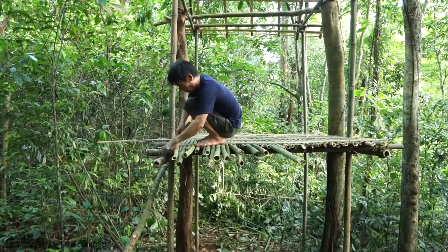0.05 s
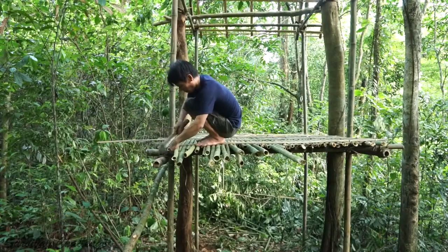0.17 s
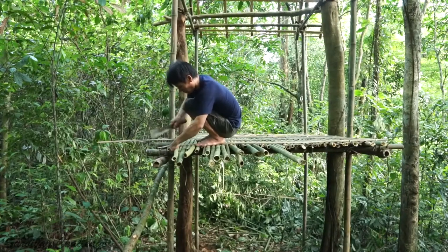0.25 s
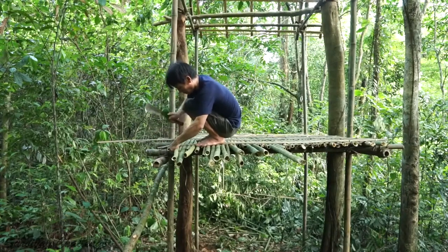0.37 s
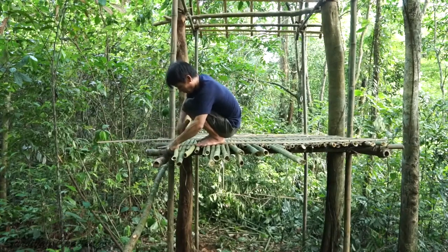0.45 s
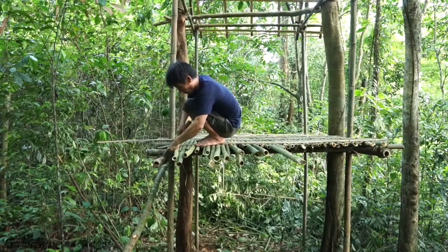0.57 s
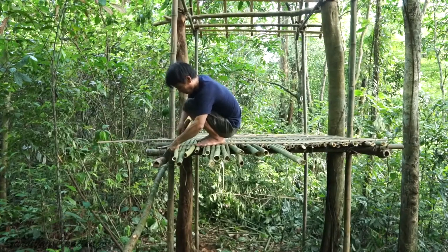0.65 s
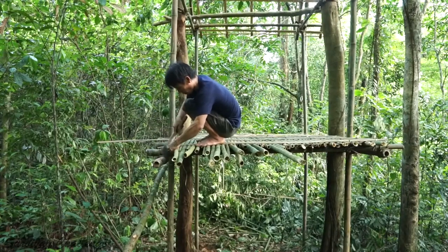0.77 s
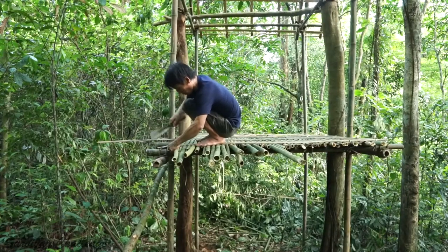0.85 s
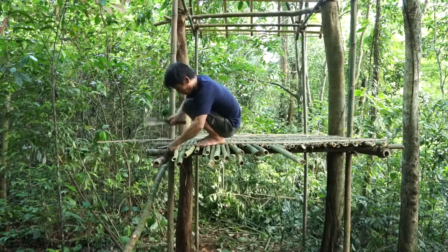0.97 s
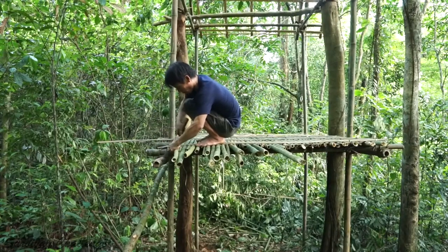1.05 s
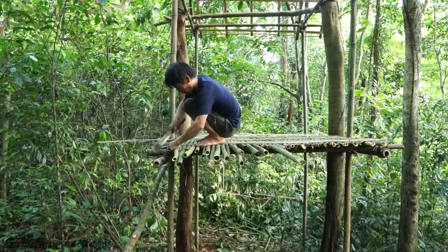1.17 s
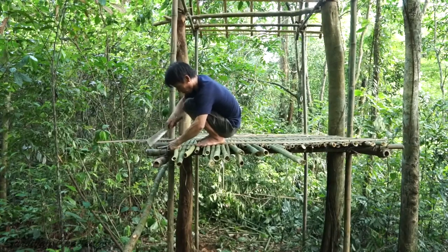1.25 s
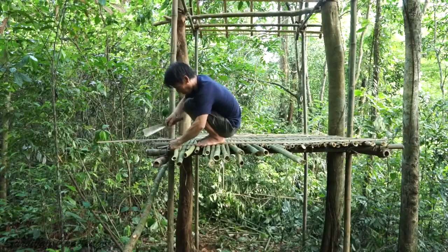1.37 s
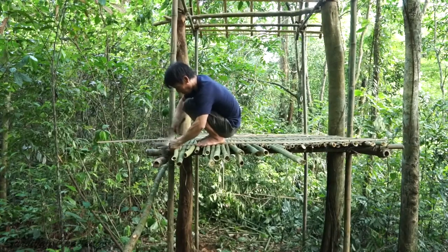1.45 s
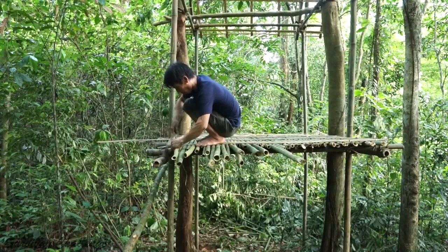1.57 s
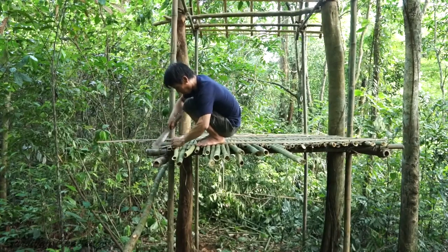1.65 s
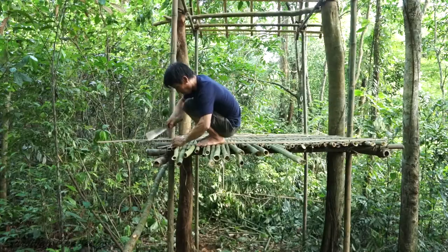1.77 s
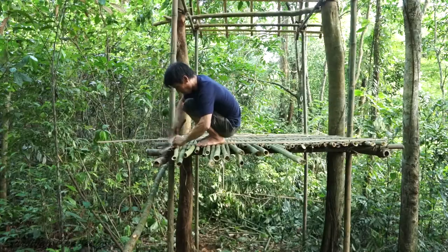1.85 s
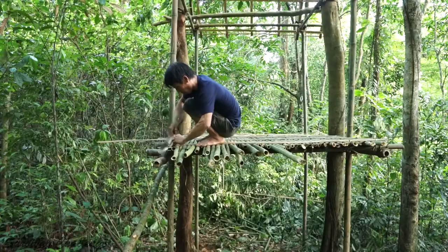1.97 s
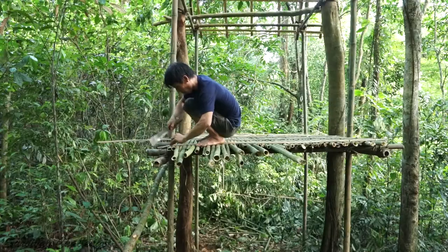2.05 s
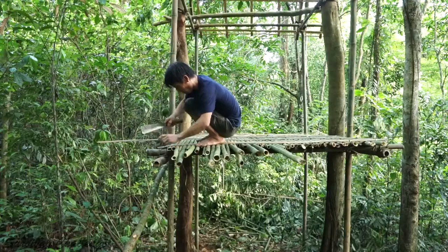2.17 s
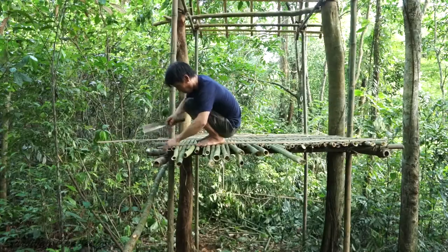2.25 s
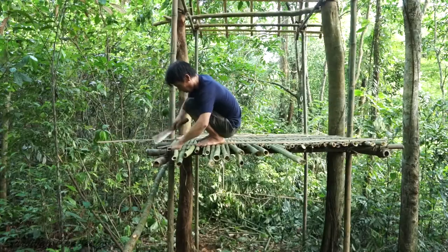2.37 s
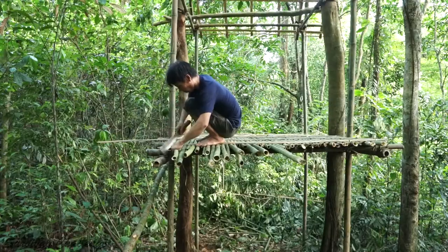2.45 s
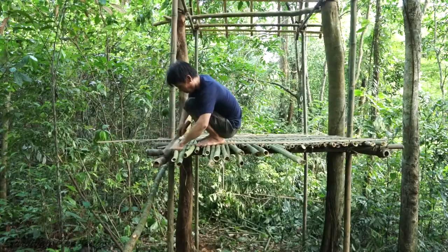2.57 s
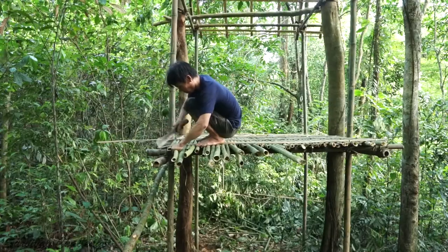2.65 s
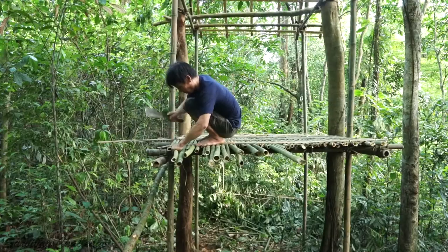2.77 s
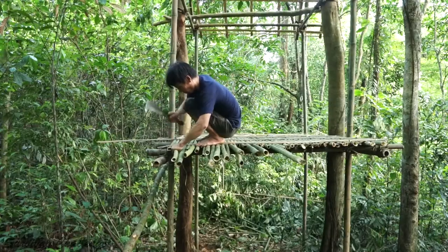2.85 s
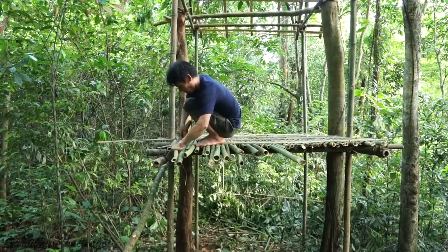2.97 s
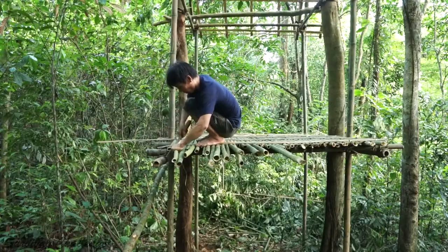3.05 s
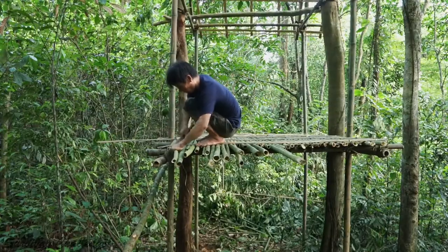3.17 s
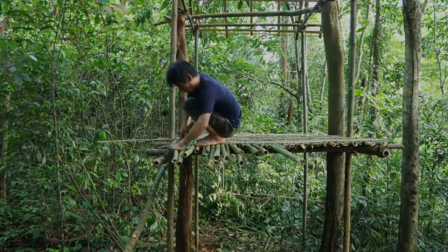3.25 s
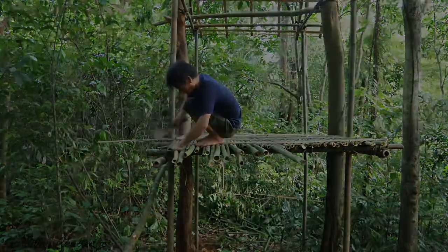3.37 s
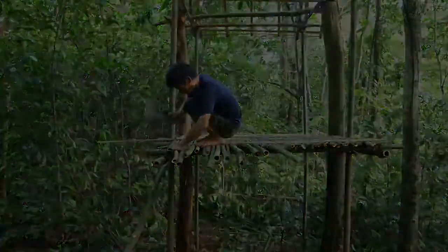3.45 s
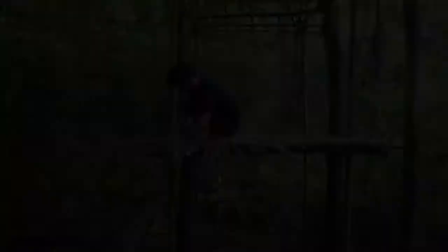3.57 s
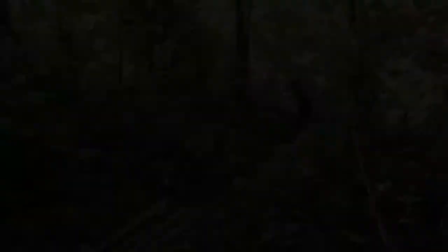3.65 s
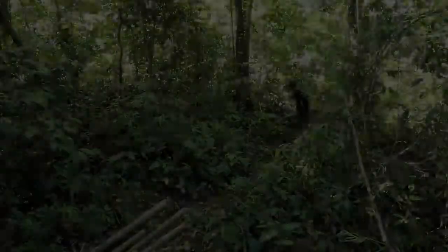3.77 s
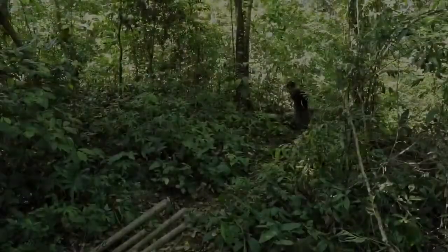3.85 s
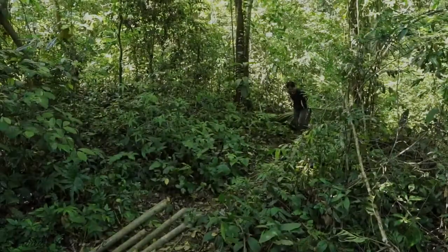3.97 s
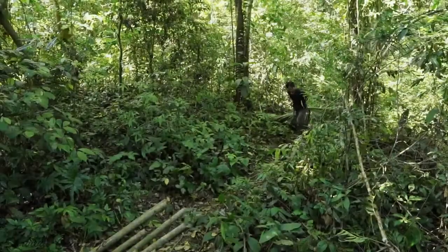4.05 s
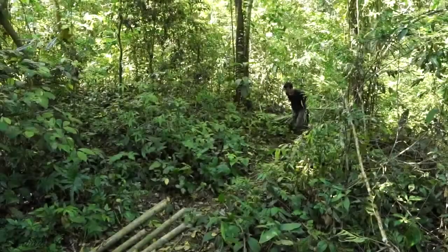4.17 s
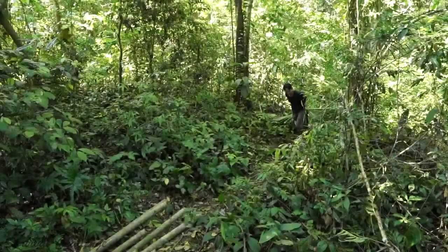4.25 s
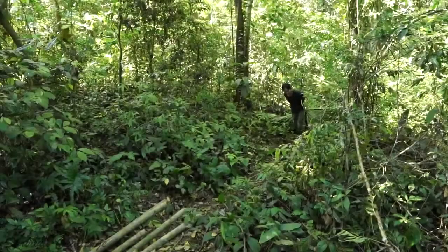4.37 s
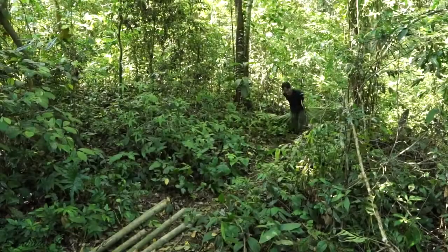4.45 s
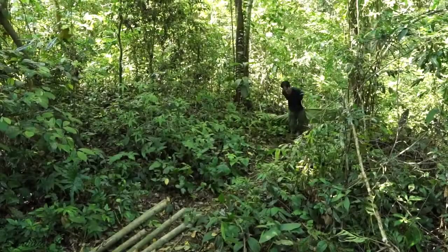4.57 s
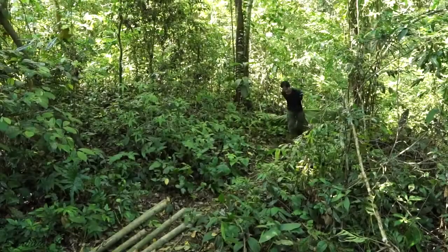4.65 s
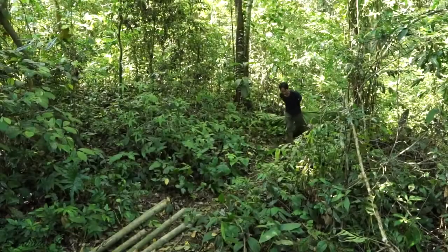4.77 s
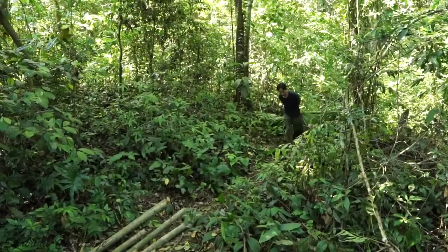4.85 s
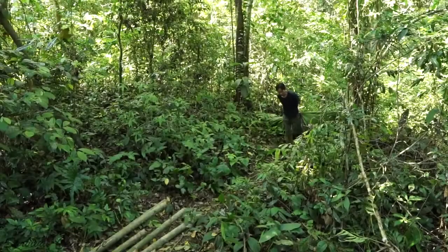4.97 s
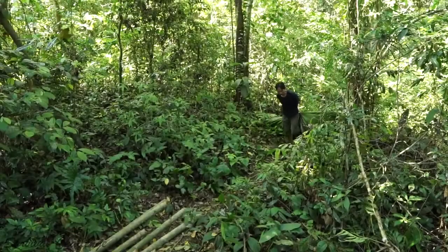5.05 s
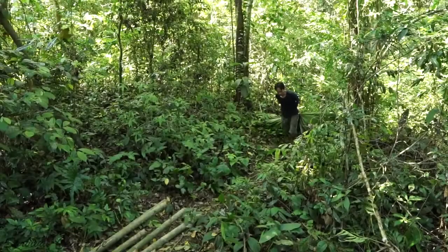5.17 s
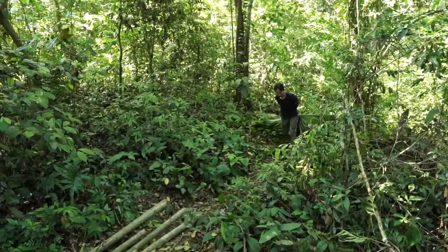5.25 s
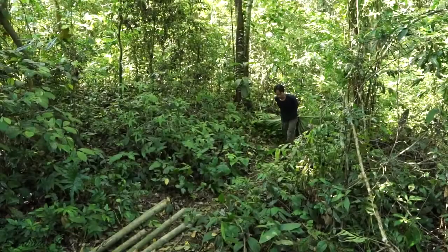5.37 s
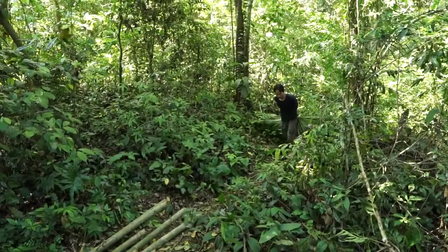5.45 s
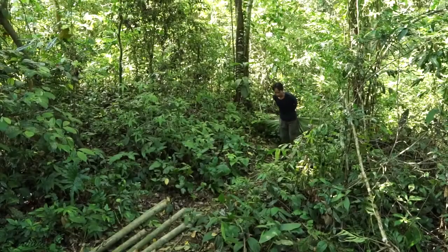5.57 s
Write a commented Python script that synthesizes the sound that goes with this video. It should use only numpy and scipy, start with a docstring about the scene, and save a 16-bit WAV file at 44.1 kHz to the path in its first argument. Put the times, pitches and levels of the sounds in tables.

```python
"""A platform in a jungle, where bamboo poles are knocked into place. Each blow excites the hollow modes of
poles and floor; small clacks, soft bumps and shaken leaves join in, and insects sing behind. After a short
silence comes a second spot, where strides swell a steady forest hiss and dry twigs snap. Trees scatter
the impacts back. Mains hum and a thin electric whine lie under both spots; the sound is mono."""
import sys
import numpy as np
from scipy import signal
from scipy.fft import rfft, irfft
from scipy.io import wavfile
from scipy.ndimage import uniform_filter1d, minimum_filter1d

SR = 44100
rng = np.random.default_rng(int(sys.argv[2]) if len(sys.argv) > 2 else 0)


def output_pcm(signal):
    """Save a mono or channel-first signal as 16-bit PCM at the path in sys.argv[1].

    Samples are clipped to [-1, 1] before scaling.
    """
    pcm = np.clip(np.atleast_2d(signal).T, -1, 1) * 32767
    wavfile.write(sys.argv[1], SR, np.round(pcm).astype(np.int16))


N = 247401
T = np.arange(N) / SR

# spectra of dry wood contacts and of brushing leaves: (frequency [Hz], relative level [dB])
WOOD_SPECTRUM = [(60, -53), (200, -33), (450, -9), (700, -2.5), (1200, -0.5), (3000, 1), (5500, -2),
                 (9500, -3), (12000, -10.5), (16000, -30)]
LEAF_SPECTRUM = [(100, -6.5), (170, -1), (330, -1), (520, 1), (800, -1), (1000, -3.5), (1300, -1.5),
                 (1900, -5.5), (2800, -2), (3700, -5), (5400, -6), (9500, -8.5), (12000, -18.5),
                 (15500, -25)]


def knock(t, body_db, low_db, rise, t60, hollow_hz, upper_hz):
    """Impact excitation: the contact cracks, then the modes decay freely as neighbouring poles rattle."""
    # modes of the bamboo floor: (frequency [Hz], relative level [dB], t60 over the blow's [ratio])
    modes = [(232, -15.5, 1.9), (333, -9.5, 3.2), (382, -13.5, 1.5), (486.4, -0.5, 1.76), (561, 2.5, 2.3),
             (660, -15.5, 0.51), (810, -9.5, 3.6), (879, 0.5, 1.65), (973, -15.5, 1.75), (1037, -3.5, 0.86),
             (1170, -2.5, 0.85), (1355, 2, 0.85), (1570, -3, 1.6), (1750, 4, 0.48), (1610, -27, .9),
             (2030, -3, 0.52), (2200, -10, 0.86), (2506, 0.5, 0.45), (2575, -25, 0.52), (3050, -1, 0.89),
             (3720, -36, 0.91), (4620, -1, .6)]
    # spectra of the rattle and the crack: (frequency [Hz], relative level [dB])
    rattle_spectrum = [(60, -47), (150, -10.5), (230, -10), (450, 0), (750, 1.5), (1050, 1), (1500, -4),
                       (2600, -7.5), (5000, -18), (9000, -15), (12000, -25), (16000, -38)]
    crack_spectrum = [(80, -53), (300, -25), (1000, -38), (2500, -0.5), (4500, -3.5), (7500, -2),
                      (10000, -7), (12000, -14.5), (16000, -50)]

    def emphasis(f):  # where the blow lands decides which modes stand out
        return 9 * hump(f, hollow_hz, 0.16) + 6 * hump(f, upper_hz, 0.14) + low_db * hump(f, 445, 1.0)
    hz, db, t60_ratio = np.transpose(modes)
    scatter_db, detune, start_cycles = rng.standard_normal((len(hz), 3)).T
    gain = undb(db + emphasis(hz) + scatter_db)
    phase = 2 * np.pi * (np.outer(hz * (1 + .01 * detune), t) + start_cycles[:, None])
    partials = np.sin(phase) * fade(t, rise, t60 * t60_ratio[:, None])
    ring = gain @ partials / np.sqrt(np.sum(gain ** 2) / 2)
    rattle = burst(lambda f: slope(rattle_spectrum)(f) + emphasis(f), fade(t, rise, 1.27 * t60))
    crack = burst(slope(crack_spectrum), fade(t, rise=0.00012, t60=0.035))
    crack_db = -4.5 + 2.4 * (body_db + 8)  # harder blows crack disproportionately more
    return undb(body_db) * (undb(-3.5) * ring + undb(0.08) * rattle) + undb(crack_db) * crack


def clack(t, db, tilt_db, ring_hz, t60):
    """Resonance: a light contact between poles excites a common hollow note and one ring of its own."""
    def shape(f):
        return wood(f, tilt_db) + 9 * hump(f, ring_hz, 0.11) + 8 * hump(f, 1010, 0.054)
    rise = 0.014 * t60  # a longer slide also builds up longer
    return undb(db) * burst(shape, grain(t, spread_db=1.1) * fade(t, rise, t60))


def twig(t, db, tilt_db, ring_hz, t60, splinter_db):
    """Brittle fracture: a dry snap, then the last fibres give way, weaker and brighter."""
    def crack(tilt):
        envelope = grain(t, spread_db=1) * fade(t, 0.00023, t60)
        return burst(lambda f: wood(f, tilt) + 6 * hump(f, ring_hz, 0.21), envelope)
    delay_s = .023
    splinter = np.pad(crack(tilt_db + 2), (int(delay_s * SR), 0))[:len(t)]
    return undb(db) * (crack(tilt_db) + undb(splinter_db) * splinter)


def bump(t, db, hz, t60):
    """Soft contact: the slow push of a hand or foot excites only a low, narrow band."""
    def shape(f):
        return -20 * np.log10(1 + 1.3 * (f / hz - hz / (f + 30)) ** 2)
    return undb(db) * burst(shape, fade(t, 0.036 * t60, t60))


def shake(t, db, t60):
    """Friction: leaves shaken by the poles brush each other in a short crackle."""
    return undb(db) * burst(slope(LEAF_SPECTRUM), grain(t, spread_db=4.5) * fade(t, .02, t60))


def trees(x):
    """Scattering: near trunks and leaves return a short tail, far ones a faint long tail."""
    # spectrum of the scattered sound: (frequency [Hz], relative level [dB])
    echo_spectrum = [(100, 6), (400, 0.5), (1000, -10), (2500, -2), (5000, 2), (9000, -1.5), (13000, -6),
                     (16000, 0)]
    t = T[:SR]
    near = fade(t, rise=0.023, t60=0.17)
    far = undb(-9.5) * fade(t, rise=0.023, t60=0.84)
    tail = burst(slope(echo_spectrum), near + far)
    return signal.fftconvolve(x, tail / np.sqrt(np.sum(tail ** 2)))[:N]


def undergrowth():
    """Incoherent addition: a steady leaf hiss and the swell of each stride sum in power."""
    # strides through the leaves: (time [s], level [dB])
    strides = [(3.84, -36.5), (3.99, -39), (4.55, -38.5), (5.02, -37.5), (5.46, -35.5)]
    # the low swish comes and goes more than the fine hiss
    swish = noise(lambda f: 35 * hump(f, 900, 1.1)) * undb(-13 + 2.7 * drift(7))
    hiss = noise(slope(LEAF_SPECTRUM)) * undb(1.3 * drift(25.38) + 0.85 * drift(400))
    swells = [undb(db) * fade(np.maximum(T - s, 0), rise=0.093, t60=4.5) for s, db in strides]
    steady = undb(-40)
    return (hiss + swish) * np.sqrt(steady ** 2 + np.sum(np.square(swells), axis=0))


def insects():
    """Narrow-band noise: distant choruses merge into shimmering bands; one high insect calls briefly."""
    # choruses: (centre [Hz], nominal width [Hz], level [dB])
    choruses = [(3734, 290, -44.5), (4830, 420, -53.5), (7160, 210, -56), (7580, 230, -58.5)]
    # strength of the single call: (time [s], level [dB])
    call_levels = [(.1, -71), (.25, -52), (.5, -62), (.62, -90), (1, -120)]

    def band(hz, half_width_hz):
        return noise(lambda f: -20 * np.log10(1 + ((f - hz) / half_width_hz) ** 2))
    chorus = sum(band(hz, 0.67 * width) * undb(db + drift(8.24) + 0.55 * drift(45))
                 for hz, width, db in choruses)
    return chorus + band(10780, 130) * undb(np.interp(T, *np.transpose(call_levels)))


def forest_air():
    """Ambient noise: a broad, slightly wavering band with a faint, far drone."""
    # spectrum of the ambience: (frequency [Hz], relative level [dB])
    air_spectrum = [(25, 15), (70, 3), (150, 4.5), (330, 0), (600, 4), (1300, 2), (2000, -1), (3000, -3.5),
                    (5800, -5), (8500, -14.5), (11500, -17), (16000, -18.5)]
    drone = noise(lambda f: 60 * hump(f, 235.0, 0.11)) * undb(-55.5)
    return noise(slope(air_spectrum)) * undb(-44.5 + .5 * drift(6.84)) + drone


def mains(first, second, mains_hz=50):
    """Electrical interference: harmonics hum, and a high whine is on for half of every mains cycle."""
    # hum harmonics from the fundamental up: (level [dB])
    hum_levels = [-38.5, -57, -56]
    # whine tones: (frequency [Hz], level at the first spot [dB], level at the second [dB])
    whine_tones = [(4890, -72, -49.5), (9640, -66, -55), (12940, -67, -52)]
    hum = sum(undb(db) * tone(mains_hz * k) for k, db in enumerate(hum_levels, 1))
    gate = uniform_filter1d(1. * (T * mains_hz % 1 > .5), size=30)
    whine = sum((undb(first_db) * first + undb(second_db) * second) * tone(hz)
                for hz, first_db, second_db in whine_tones)
    return hum * (first + second) + gate * whine


def ducking(second_start_s, sunk_db=-3.5, recover_db_per_s=2):
    """Gain ducking: the background drops to one level at the listed hits, then climbs steadily."""
    # the sharpest hits: (time [s])
    hit_times = [.557, 1.139, 3.027, 5.27]
    # gain before any hit: (first spot [dB], second spot [dB])
    resting_gains = [-0.8, 2.5]
    at_first = T < second_start_s
    db = np.where(at_first, *resting_gains)
    for s in hit_times:
        same_spot = at_first == (s < second_start_s)
        db = np.where((T > s) & same_spot, sunk_db + recover_db_per_s * (T - s), db)
    return undb(uniform_filter1d(db, size=400))


def burst(shape, envelope):
    """Source and filter: a flurry of contacts rings a body whose spectrum in dB is shape(Hz)."""
    size = len(envelope)
    flurry = rfft(rng.standard_normal(size) * envelope)
    f = np.maximum(np.fft.rfftfreq(size, 1 / SR), 1)
    # sharp contacts spread their energy evenly over frequency, so the flurry is flattened
    local_magnitude = np.sqrt(uniform_filter1d(np.abs(flurry) ** 2, size=50))
    cepstrum = irfft(np.log(undb(shape(f)) / local_magnitude))
    causal = np.r_[1, np.full(size // 2 - 1, 2), np.zeros(size // 2)]
    response = np.exp(rfft(cepstrum * causal))  # minimum phase: the ring follows the contact
    return unit(irfft(flurry * response)) * np.sqrt(np.mean(envelope ** 2))


def grain(t, spread_db):
    """Stick-slip: fibres catch and release, so the strength changes every millisecond."""
    steps = t[::SR // 1000]
    return undb(spread_db * np.interp(t, steps, rng.standard_normal(len(steps))))


def fade(t, rise, t60):
    """Damping: a linear rise, then an exponential decay of 60 dB in t60 seconds."""
    return np.minimum(t / max(rise, 1 / SR), 1) * np.exp(-np.log(1000) * np.maximum(t - rise, 0) / t60)


def wood(f, tilt_db):
    """Spectral tilt: the dry wood spectrum in dB, tipped by tilt_db per octave."""
    return slope(WOOD_SPECTRUM)(f) + tilt_db * np.log2(f / 3000)


def slope(points):
    """Interpolation over log frequency: a spectrum table as a function from Hz to dB."""
    hz, db = np.transpose(points)
    return lambda f: np.interp(np.log(f), np.log(hz), db)


def hump(f, hz, octaves):
    """Resonance peak: a bell of height 1 around hz."""
    return np.exp(-.5 * (np.log2(f / hz) / octaves) ** 2)


def noise(shape):
    """Spectral shaping: noise of rms 1 whose spectrum in dB is shape(Hz)."""
    f = np.maximum(np.fft.rfftfreq(N, 1 / SR), 1)
    return unit(irfft(rfft(rng.standard_normal(N)) * undb(shape(f)), N))


def drift(rate_hz):
    """Random modulation: smoothed steps of rms 1."""
    k = int(SR / rate_hz)
    steps = np.repeat(rng.standard_normal(N // k + 1), k)
    return unit(uniform_filter1d(uniform_filter1d(steps, k), k)[:N])


def tone(hz):
    """Pure tone of rms 1."""
    return np.sqrt(2) * np.sin(2 * np.pi * hz * T)


def undb(db):
    """Decibels to amplitude ratio."""
    return 10 ** (np.asarray(db) / 20)


def unit(x):
    """Normalisation to rms 1."""
    return x / np.sqrt(np.mean(x ** 2))


def play(table, voice):
    """Superposition: each row of a table sounds at its time."""
    out, t = np.zeros(N + SR), T[:2 ** 14]
    for s, *row in table:
        start = max(int(s * SR), 0)
        out[start:start + len(t)] += voice(t, *row)
    return out[:N]


def scene():
    """Superposition of contacts and background: the platform, a moment of silence, the undergrowth."""
    # blows on the poles: (time [s], body level [dB], low emphasis [dB], rise [s], base t60 [s],
    # hollow ring [Hz], upper ring [Hz])
    blows = [(0.1355, -24.5, 0.5, 0.0012, 0.077, 333, 750), (0.557, -7.5, -3, 0.0063, 0.083, 1115, 2250),
             (1.1393, -12.5, -7.5, .0004, 0.12, 1080, 4840),
             (1.577, -13.5, -8.5, 0.0033, 0.059, 1004, 2800), (1.9765, -11, -3, 0.0013, 0.091, 1010, 2080),
             (2.6055, -19, 8, 0.0021, 0.089, 1120, 1820), (3.027, -13, 2.5, 0.0021, 0.036, 1600, 1750)]
    # poles clacking and sliding: (time [s], level [dB], tilt [dB/octave], ring [Hz], t60 [s])
    clacks = [(0.212, -26.5, -2, 1290, 0.12), (0.223, -29.5, 1, 1310, 0.24),
              (1.1405, -9, -2.5, 4700, 0.0047), (1.490, -21, -1, 3000, 0.048),
              (1.506, -30.5, -3, 2500, .053), (1.5435, -23, -3, 3170, 0.049),
              (1.565, -18, -1.5, 1250, 0.17), (1.5775, -9, 2, 9270, 0.025), (1.645, -24, -2.5, 9500, 0.04),
              (1.6715, -16.5, -1.5, 2370, .049), (1.705, -22.5, 0, 2700, 0.03),
              (1.7555, -26.5, 0, 2430, 0.039), (1.974, -15, 4, 7500, 0.038),
              (2.815, -22.5, 0.5, 7500, 0.032), (3.025, -14.5, -1.5, 1480, 0.1),
              (3.0297, -2, -2.5, 2600, 0.0031)]
    # snapping twigs: (time [s], level [dB], tilt [dB/octave], ring [Hz], t60 [s], splinter [dB re snap])
    twigs = [(3.862, -18.5, -1, 820, .038, -8), (4.353, -21.5, 0, 3250, 0.04, -4.5),
             (5.269, -17.5, 3, 2190, 0.02, -16)]
    # hands and feet: (time [s], level [dB], centre [Hz], t60 [s])
    bumps = [(0.242, -32, 480, 0.093), (0.79, -39.5, 1000, 0.26), (2.665, -37, 180, 0.11),
             (2.816, -25, 242, 0.033), (3.231, -23, 383, 0.018), (3.238, -30, 167, .072),
             (3.35, -41.5, 1090, .18), (3.433, -31, 148, 0.096), (3.541, -35.5, 420, 0.088),
             (3.605, -37, 230, 0.14), (4.785, -39, 850, .15)]
    # shaken leaves: (time [s], level [dB], t60 [s])
    shakes = [(1.28, -43, 0.83), (1.87, -43, 0.12), (3.05, -34.5, 0.51)]
    first_end_s, second_start_s = 3.657, 3.694
    first = np.clip((first_end_s - T) / 0.0031, 0, 1)
    second = np.clip((T - second_start_s) / 0.023, 0, 1)
    contacts = play(blows, knock) + play(clacks, clack) + play(twigs, twig)
    contacts += play(bumps, bump) + play(shakes, shake)
    contacts += undb(-10.0) * trees(contacts)
    air = forest_air() * first
    chorus = insects() * (first + undb(-5.5) * second)  # further off at the second spot
    background = air + chorus + undergrowth() * second + mains(first, second)
    mono = contacts * (first + second) + ducking(second_start_s) * background
    return np.array([mono, mono])


def record(dry, ceiling=.93, cutoff_hz=15900):
    """Peak and band limiting: a fast gain dip holds down the sharpest peaks, then the top is cut."""
    needed = 1 / np.maximum(np.abs(dry) / ceiling, 1)
    gain = uniform_filter1d(minimum_filter1d(needed, size=90), size=90)
    return signal.sosfilt(signal.ellip(10, .2, 70, cutoff_hz, fs=SR, output="sos"), dry * gain)


dry = scene()
out = record(dry)
output_pcm(out)
```